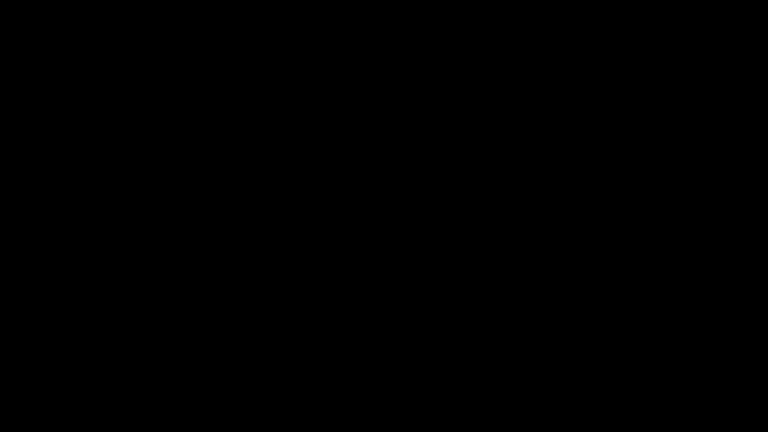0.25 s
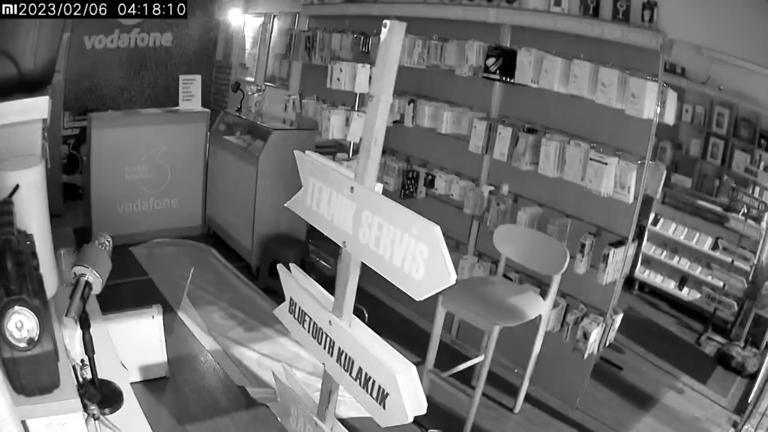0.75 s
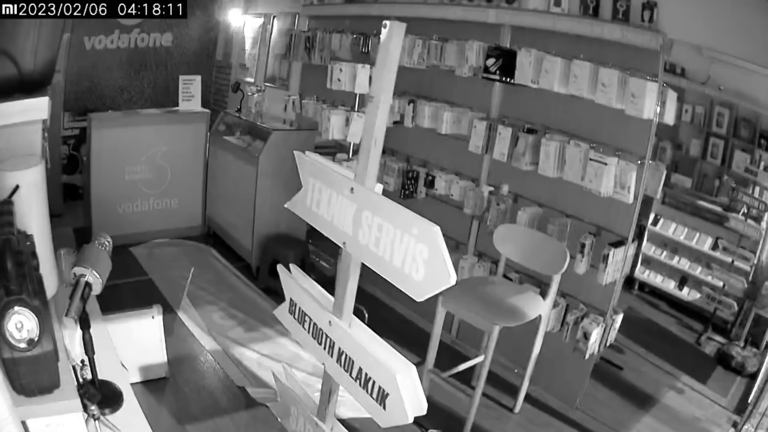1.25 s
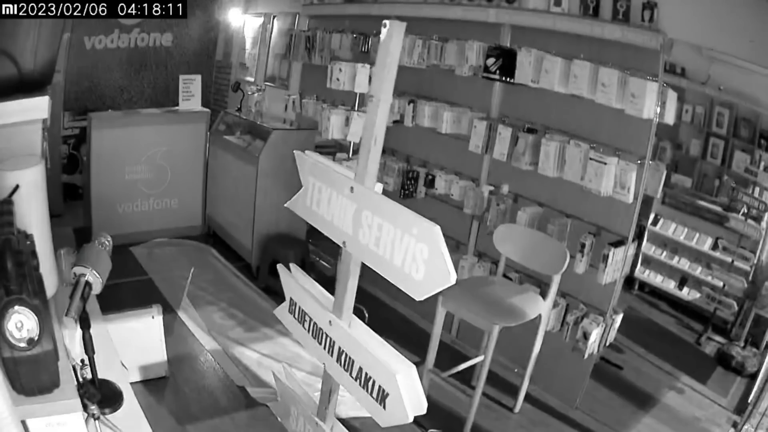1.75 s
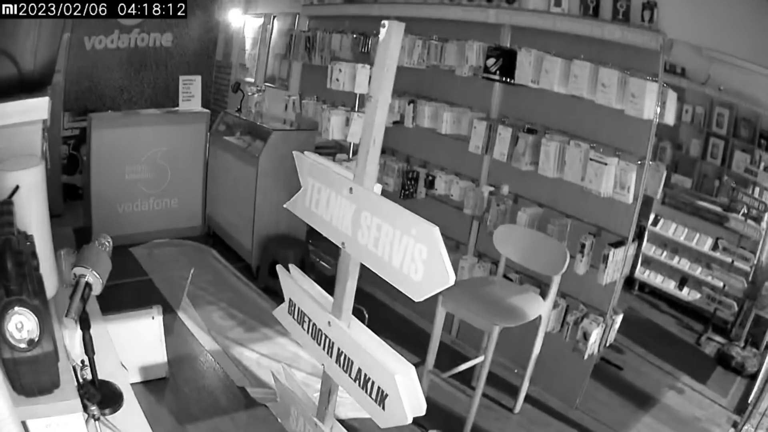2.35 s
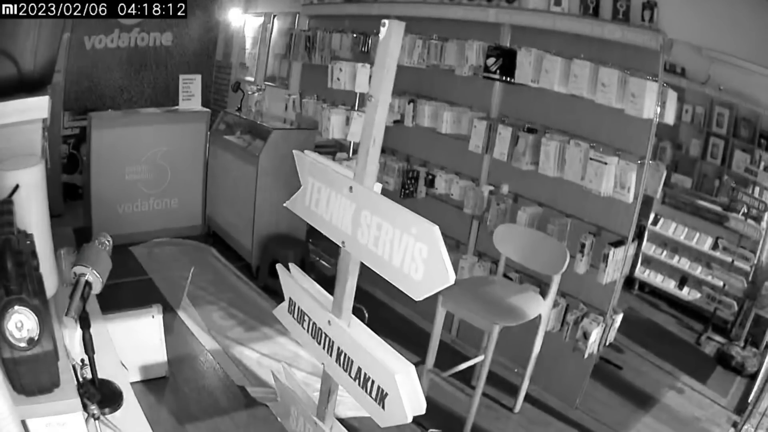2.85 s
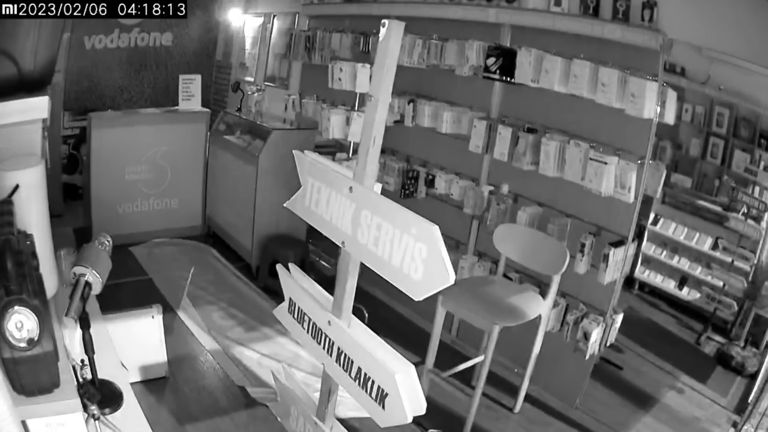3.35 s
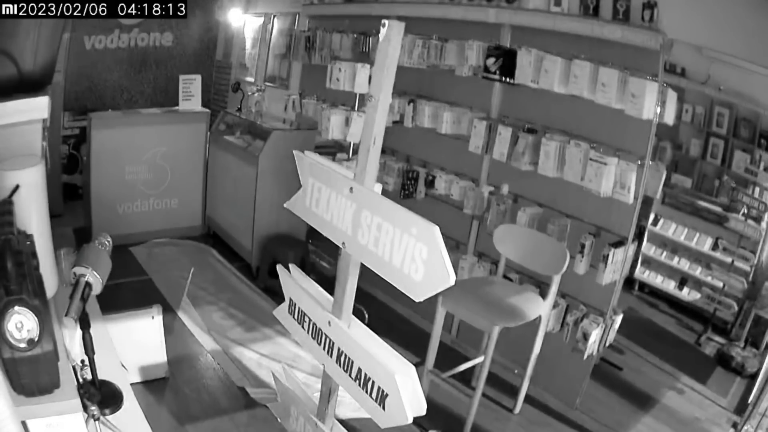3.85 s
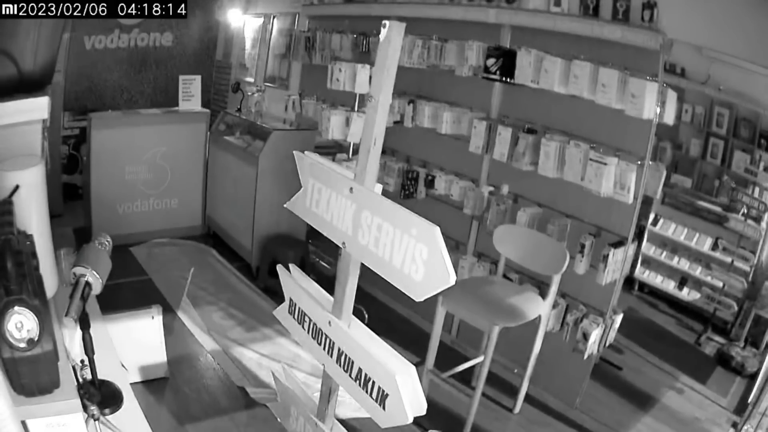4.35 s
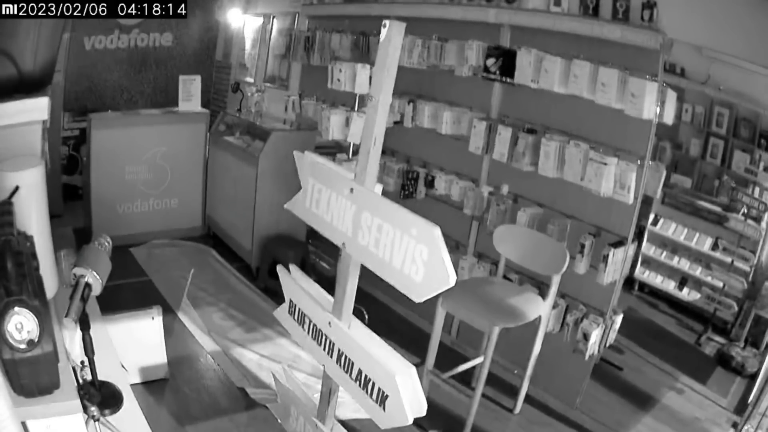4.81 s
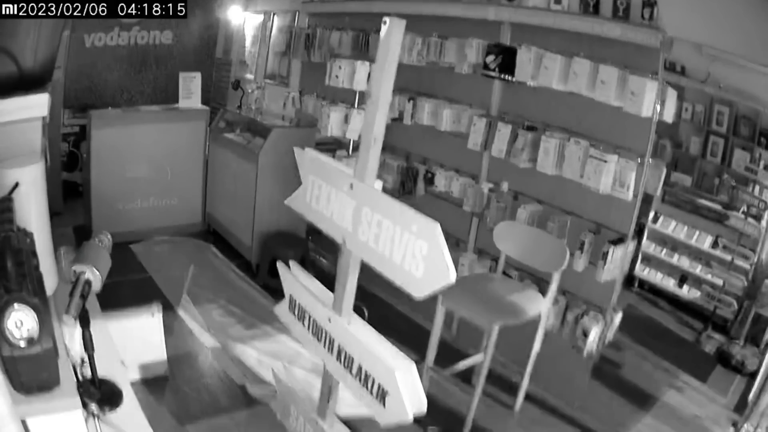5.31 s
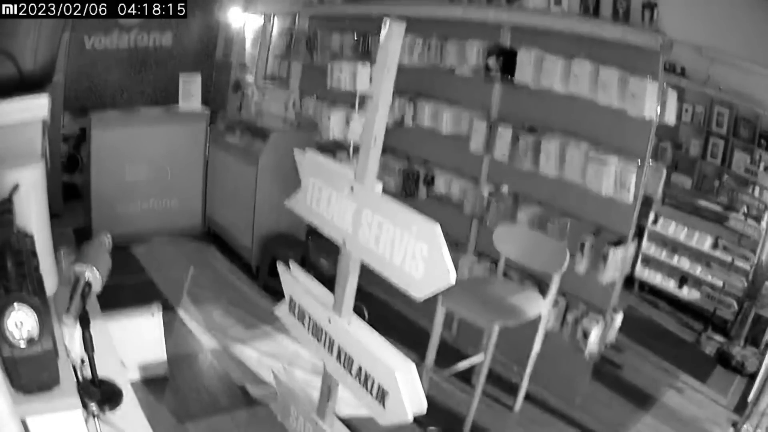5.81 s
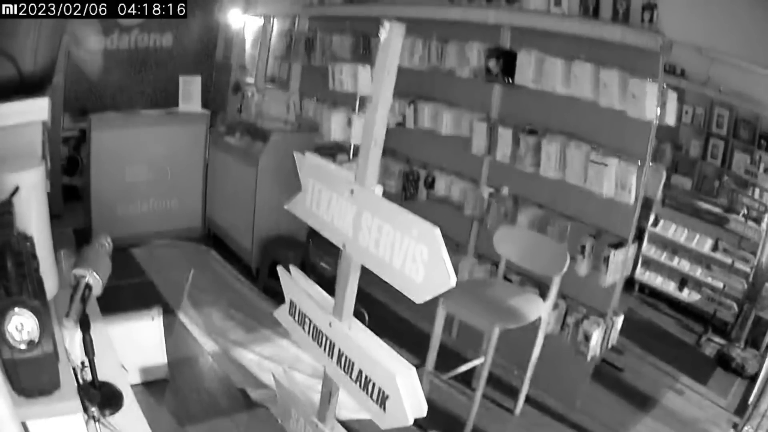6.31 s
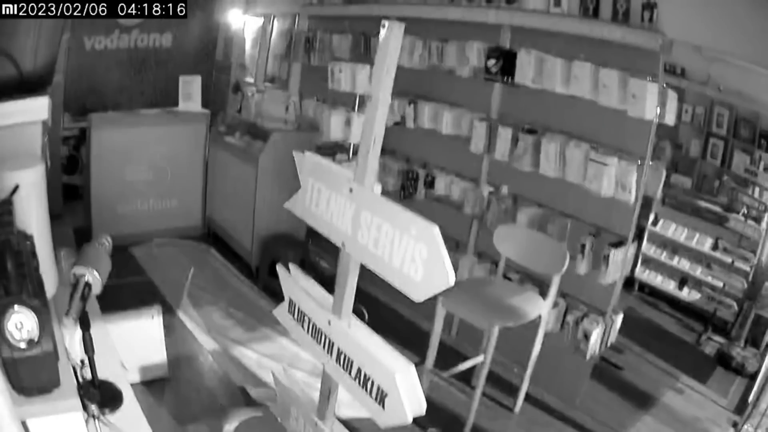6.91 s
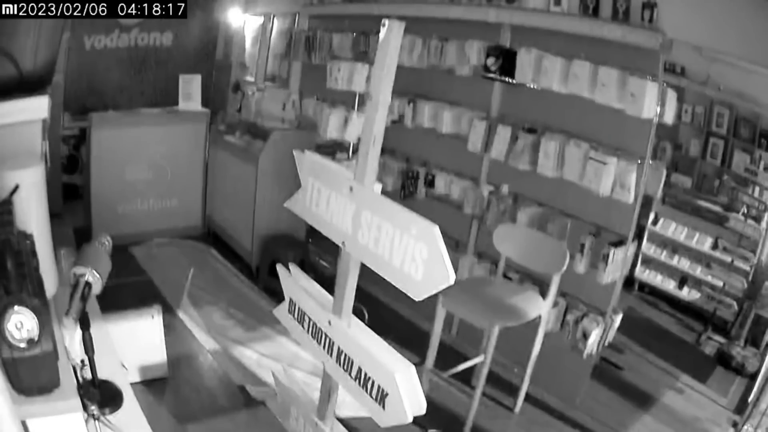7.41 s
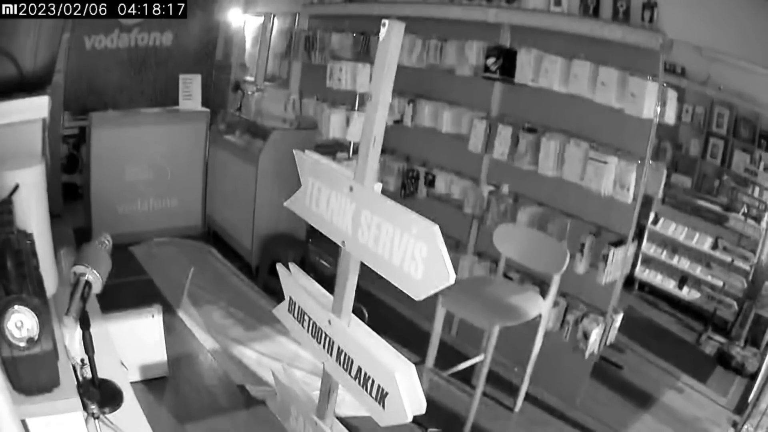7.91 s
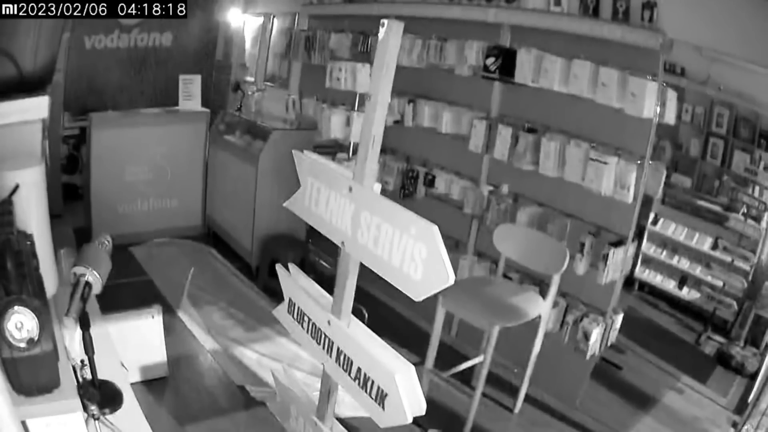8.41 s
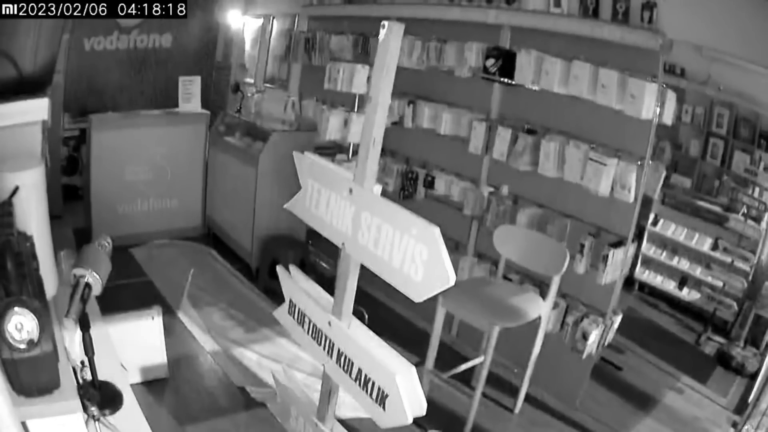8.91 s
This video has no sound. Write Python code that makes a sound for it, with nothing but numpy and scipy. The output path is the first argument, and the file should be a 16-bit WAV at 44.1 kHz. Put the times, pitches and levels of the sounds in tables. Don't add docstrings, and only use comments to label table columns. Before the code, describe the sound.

A very brief loud roar is chopped off into nearly a second of silence. Then a shaking shop: a loose metal fitting knocks irregularly on hollow shelving, over counter thuds and groaning panels. Clatter thickens midway, small goods jingle, and boxes crash down around seven seconds. Hard knocks continue to the end. Dense, close indoor echoes; narrow, muffled mono camera microphone, overloading, with watery compression and short dropouts.

```python
import sys
import numpy as np
from scipy import signal
from scipy.fft import rfft, irfft, next_fast_len
from scipy.io import wavfile
from scipy.ndimage import uniform_filter1d, minimum_filter1d

SR = 44100
rng = np.random.default_rng(int(sys.argv[2]) if len(sys.argv) > 2 else 0)


def amplitude_ratio(level_db):
    exponent = np.asarray(level_db, float) / 20
    return 10 ** exponent


def materialize(psi):
    bounded = np.clip(np.atleast_2d(psi).T, -1, 1)
    quanta = np.round(bounded * 32767).astype(np.int16)
    wavfile.write(sys.argv[1], SR, quanta)


N = 403956
T = np.arange(N) / SR


def rms_one(x):
    return x / np.sqrt(np.mean(x ** 2) + 1e-20)


def in_time(rows):
    s, *columns = np.transpose(rows)
    return [np.interp(T, s, c) for c in columns]


def coloured(x, spectrum):
    hz, level_db = np.transpose(spectrum)
    size = next_fast_len(N)
    log_hz = np.log(np.arange(size // 2 + 1) * SR / size + 1)
    gain = amplitude_ratio(np.interp(log_hz, np.log(hz), level_db))
    return rms_one(irfft(rfft(x, size) * gain, size)[:N])


def resonate(x, hz, width_hz):
    r = np.exp(-np.pi * max(width_hz, 3) / SR)
    w = 2 * np.pi * hz / SR
    return signal.lfilter([0, np.sin(w)], [1, -2 * r * np.cos(w), r * r], x + 1e-18)


def contacts(per_s, spread_db):
    where, size, sign = rng.random((60000, 3))[:round(per_s * N / SR)].T
    out = np.zeros(N)
    at = (where * N).astype(int)
    out[at] = amplitude_ratio(spread_db * np.minimum(-np.log(size), 4)) * np.sign(sign - .5)
    return rms_one(out)


def body(modes, per_s, spread_db):
    total = np.zeros(N)
    for hz, width_hz, db in modes:
        total += amplitude_ratio(db) * rms_one(resonate(contacts(per_s, spread_db), hz, width_hz))
    return rms_one(total)


def high_pass(x, order, hz):
    return signal.sosfilt(signal.butter(order, hz, "high", fs=SR, output="sos"), x)


def low_pass(x, order, stop_db, hz):
    return signal.sosfilt(signal.cheby2(order, stop_db, hz, fs=SR, output="sos"), x)


# t/s, level/dB
ROAR_LEVEL = [
    (0.0, -15),
    (0.054, -12),
    (0.134, -11),
    (0.147, -10.5),
]
# f/Hz, density/dB per Hz
ROAR_SPECTRUM = [(60, -11), (105, -9.5), (260, -2), (600, -9.5), (2240, -19), (5000, -35), (11500, -57.5),
                 (12300, -80.5)]
ROAR_END_S = .1485


def roar():
    loud = amplitude_ratio(in_time(ROAR_LEVEL)[0] + 1.5) * coloured(rng.standard_normal(N), ROAR_SPECTRUM)
    return low_pass(.9 * np.tanh(loud / .9), 12, 50, 12200) * (T < ROAR_END_S)


# clean ring/dB, rattling modes/dB, echo/dB, scatter of mode strengths/dB
CLATTER_STRIKE, FITTING_STRIKE = (-0.5, -1, -1, 6), (4, -3.5, -2, 1.2)
BUMP_STRIKE, FALL_STRIKE = (2, -2, 0.5, 3.5), (-4, -4.5, 1.5, 7)

# t/s, peak/dB, brightness/dB, t60/s
CLATTER_BLOWS = [(1.062, -37.5, -8.5, 0.48), (2.977, -46.5, -5, 0.33), (3.911, -32.5, -6, 1),
                 (4.654, -39.5, -13, 0.97), (5.042, -23.5, -13, 0.57), (5.15, -18, -7, 0.34),
                 (5.18, -28, -17, 0.84), (5.572, -19.5, -9, 0.42), (5.671, -22, -31.5, 0.58),
                 (6.086, -20, -22, 0.27), (6.147, -17.5, -19, 0.47), (6.203, -15, -10.5, 0.28),
                 (6.471, -27, -37, 0.46), (6.493, -16, -18, 0.33), (6.521, -11.5, -9.5, 0.52),
                 (6.545, -13, -11.5, 0.59), (6.609, -12.5, -13.5, 0.22), (6.976, -31, 2.5, 0.25),
                 (7.251, -34, -3.5, 0.15), (8.188, -35, -29.5, 0.43), (8.236, -30.5, 2.5, 0.28),
                 (8.269, -34, -4, 0.28)]
CLATTER_WOOD_DB = -23.5


def clatter():
    return [(s, db, bright, CLATTER_WOOD_DB, t60, *CLATTER_STRIKE) for s, db, bright, t60 in CLATTER_BLOWS]


# t/s, peak/dB, brightness/dB
FITTING_BLOWS = [(1.155, -10.5, -21.5), (1.905, -16, -27), (2.067, -14.5, -18.5), (2.242, -10.5, -18.5),
                 (2.573, -18.5, -25.5), (3.359, -15, -22), (3.471, -19, -22), (3.619, -11.5, -14.5),
                 (3.788, -7.5, -15.5), (3.936, -11, -16.5), (4.08, -14, -17.5), (4.706, -4, -14),
                 (4.878, -10.5, -12), (5.353, -8, -12.5), (5.47, -23, -8.5), (5.836, -15.5, -37),
                 (5.866, -19, -27), (6.037, -9, -31), (7.468, -7.5, -10.5), (8.324, -6.5, -17),
                 (8.472, -21.5, -30.5), (8.752, -14.5, -16.5), (8.997, -11.5, -19)]
FITTING_WOOD_DB, FITTING_WOOD_FOLLOWS, FITTING_T60_S = -27, .5, 0.29


def fitting():
    rows = []
    for s, db, bright in FITTING_BLOWS:
        wood_db = FITTING_WOOD_DB - (1 - FITTING_WOOD_FOLLOWS) * db
        rows.append((s, db, bright, wood_db, FITTING_T60_S, *FITTING_STRIKE))
    return rows


# t/s, peak/dB, wood/dB
BUMP_BLOWS = [(1.332, -35, -10.5), (1.399, -35.5, -2), (1.547, -21, -9), (1.783, -24, -8),
              (2.392, -23.5, -14), (2.722, -31, -7), (2.908, -26.5, -10.5), (3.161, -25.5, -10.5),
              (3.245, -33.5, -1.5), (4.554, -33, -12), (5.77, -25.5, -9), (8.87, -21.5, -18)]
BUMP_BRIGHT_DB, BUMP_T60_S = -49, 0.27


def bumps():
    return [(s, db, BUMP_BRIGHT_DB, wood, BUMP_T60_S, *BUMP_STRIKE) for s, db, wood in BUMP_BLOWS]


# t/s, peak/dB, brightness/dB, wood/dB, t60/s
FALL_BLOWS = [(4.465, -30.5, -9, -8, 0.3), (4.944, -21.5, -27, 3.5, 0.18), (6.778, -18, -13.5, -7.5, 0.086),
              (6.789, -20, -12, -5.5, 0.4), (6.981, -20.5, -1.5, -17, 0.18), (6.992, -12, -6, -8.5, 0.33),
              (7.142, -25, -22.5, -13, 0.47), (7.293, -31, -27.5, -3.5, 0.25), (7.584, -16, -3, -2.5, 0.35),
              (7.593, -4, -8, -6.5, 0.41), (7.6, -12.5, -3.5, -15, .3), (7.619, -6.5, -6, -14.5, 0.32),
              (7.844, -18, -12.5, 1.5, 0.3), (7.984, -16.5, -8.5, -1.5, .29)]


def falls():
    return [(*row, *FALL_STRIKE) for row in FALL_BLOWS]


def all_blows():
    return clatter() + fitting() + bumps() + falls()


def tails(times_s, level_db, t60s, rise_s):
    power, t = np.zeros(N), T[:SR // 2]
    for s, db, t60 in zip(times_s, level_db, t60s):
        i = round(s * SR)
        shape = amplitude_ratio(db - 60 * t / np.clip(t60, .05, .8)) * np.minimum(t / rise_s, 1)
        power[i:i + len(t)] += shape[:N - i] ** 2
    return np.sqrt(power)


# f/Hz, width/Hz, level/dB
UPRIGHTS = [(676, 31, -5.5), (897, 31, -13.5), (970, 14, -3), (1048.7, 25, 1.5), (1090, 17, -2),
            (1178, 22, -6.5), (1262, 23, 3.5), (1345, 20, 4), (1390, 32, 0), (1427, 27, -5),
            (1475, 30, -5.5), (1556, 30, -3.5), (1602, 28, -4.5), (1672, 33, -7.5)]
# f/Hz, width/Hz, level/dB
HOOKS = [(1752, 33, -6.5), (1836, 17, -7.5), (1911, 22, -3.5), (2108, 25, -3.5), (2139, 22, -6),
         (2315, 33, -9), (2424, 45, -9.5), (2566, 25, -9), (2866, 35, -9.5), (3004, 36, -10.5),
         (3230, 40, -11.5), (3590, 24, -18), (3860, 25, -14.5), (4010, 32, -16)]
# delay/s, level/dB
ECHOES = [(.0068, -6.5), (0.0124, -5.5), (0.0271, -9), (.04, -12.5)]
TRAVEL_S = .003
METAL_CUT_HZ = 680
LEAD_TICK_S, LEAD_TICK_DB = .0065, -20.5


def shelf_rings(at, peak_db, ring_db, scatter_db, hardness_db):
    modes = UPRIGHTS + HOOKS
    strengths = rng.standard_normal((len(at), len(modes))) * scatter_db[:, None]
    travel = np.round(rng.random(len(modes)) * TRAVEL_S * SR).astype(int)
    rings = np.zeros(N)
    for (hz, width_hz, db), strength_db, lag in zip(modes, strengths.T, travel):
        treble_db = hardness_db * np.clip((hz - 1200) / 2500, 0, 1)
        blows = np.zeros(N)
        blows[at + lag] = amplitude_ratio(peak_db + ring_db + db + strength_db + treble_db - 19.0)
        rings += resonate(blows, hz, 0.96 * width_hz)
    rings = high_pass(rings, 2, METAL_CUT_HZ)
    copies = ECHOES + [(-LEAD_TICK_S, LEAD_TICK_DB)]
    return rings + sum(amplitude_ratio(db) * np.roll(rings, round(lag_s * SR)) for lag_s, db in copies)


# f/Hz, width/Hz, level/dB
CRATE_MODES = [(383, 57, -1.5), (488, 37, 1.5), (575, 21, -3), (636, 93, 0.5), (683, 74, -4), (697, 91, -5),
               (844, 19, -9.5)]


def crate_thumps(at, level_db):
    thumps = np.zeros(N)
    thumps[at] = amplitude_ratio(level_db)
    total = np.zeros(N)
    for k, (hz, width_hz, db) in enumerate(CRATE_MODES):
        total += (-1) ** k * amplitude_ratio(db) * resonate(thumps, hz, .4 * width_hz)
    return total


# f/Hz, density/dB per Hz
SHELF_SPECTRUM = [(240, -44.5), (400, -16.5), (1000, -6.5), (1310, -2), (1680, -6), (2600, -10.5),
                  (3380, -41.5), (5720, -120)]
# f/Hz, density/dB per Hz
GOODS_SPECTRUM = [(1400, -28.5), (2100, -8.5), (2600, 4.5), (3400, 5), (4200, 1), (5000, -3), (5400, -7),
                  (6500, -43.5)]


def knocks():
    s, peak_db, bright_db, wood_db, t60, ring_db, rattle_db, echo_db, scatter_db = np.transpose(all_blows())
    at = np.round(s * SR).astype(int)
    hardness_db = np.minimum(bright_db + 19, 0)
    rings = shelf_rings(at, peak_db, ring_db, scatter_db, hardness_db)
    thumps = crate_thumps(at, peak_db + wood_db - 12.5)

    echoes = coloured(contacts(1500, spread_db=3.5), SHELF_SPECTRUM)
    echoes *= tails(s, peak_db + echo_db + 0.31 * hardness_db - 12.5, t60, rise_s=0.0033)
    humming = body(UPRIGHTS, per_s=440, spread_db=3.5)
    humming *= tails(s, peak_db + rattle_db - 14.5, 0.99 * t60, rise_s=0.006)
    shimmer = body(HOOKS, per_s=400, spread_db=2.0)
    shimmer *= tails(s, peak_db + rattle_db + 0.41 * hardness_db - 15.5, 1.2 * t60, rise_s=0.0026)
    wood = body(CRATE_MODES, per_s=590, spread_db=3.0)
    wood *= tails(s, peak_db + wood_db - 6.5, 1.1 * t60, rise_s=0.0092)
    crack = coloured(contacts(5000, spread_db=-1.5), GOODS_SPECTRUM)
    crack *= tails(s, peak_db + bright_db + 0.86 * echo_db - 4.5, 1.075 * t60, rise_s=0.00058)
    return rings + thumps + echoes + humming + shimmer + wood + crack


# t/s, level/dB
TREMOR_LEVEL = [(1.06, -56.5), (2.45, -77), (2.7, -56.5), (2.85, -71), (3.2, -67), (3.5, -64), (3.75, -73),
                (4.04, -48), (4.42, -64.5), (4.62, -52.5), (5.3, -47), (5.65, -51.5), (6.45, -58.5),
                (6.85, -56), (7.2, -57), (7.75, -44), (8.12, -54), (9.16, -49.5)]
HARD_RISE = 0.27


def swells(rows, rise_db_s, murmur_db):
    t = T[::32]
    power = amplitude_ratio(np.interp(t, *np.transpose(TREMOR_LEVEL)) + murmur_db) ** 2
    for s, db, t60 in rows:
        rise = rise_db_s * amplitude_ratio(HARD_RISE * (db + 40)) * (t - s)
        fall = -60 * (t - s) / max(t60, .05)
        power = power + amplitude_ratio(db + np.minimum(rise, fall)) ** 2
    return np.interp(T, t, np.sqrt(power))


# t/s, level/dB, t60/s
THUD_SHOVES = [(1.07, -40, 0.68), (1.17, -35.5, 0.22), (1.38, -44.5, 0.22), (1.58, -37, 0.53),
               (1.8, -29.5, 0.5), (2.14, -35.5, 0.75), (2.26, -40.5, 0.75), (2.7, -50, 0.64),
               (3.27, -36, 0.63), (3.38, -37, 0.5), (3.65, -33, 0.31), (3.79, -36.5, 0.3),
               (3.95, -38, 0.41), (4.26, -33, 0.42), (4.49, -29.5, 0.96), (4.76, -33.5, 1),
               (4.96, -22, 0.099), (5.2, -40.5, 0.51), (5.37, -34.5, 0.46), (5.87, -34, 0.22),
               (6.18, -28, 0.25), (6.36, -34.5, 0.25), (6.52, -28, 0.88), (6.79, -30.5, 0.1),
               (6.99, -35.5, 0.22), (7.31, -40.5, 0.81), (7.49, -43, 0.23), (7.6, -37, 0.19),
               (8.21, -41.5, 1), (8.91, -42.5, 0.36)]
# f/Hz, width/Hz, level/dB
COUNTER_MODES = [(65, 73, -25), (114, 20, -7), (146, 32, 1.5), (205, 66, -1.5), (230, 27, -5)]


def counter_thuds():
    return swells(THUD_SHOVES, rise_db_s=356, murmur_db=-2.5) * body(COUNTER_MODES, per_s=140, spread_db=-0.5)


# t/s, level/dB, t60/s
GROAN_SHOVES = [(1.17, -33.5, 0.12), (1.38, -34, 0.24), (1.59, -29, 0.36), (1.8, -32, 0.56),
                (2.14, -37, 0.18), (2.26, -33.5, 0.33), (3.27, -47, 0.4), (3.38, -37.5, 0.5),
                (3.65, -31, 0.22), (3.79, -38.5, 0.12), (4.26, -36, 0.37), (4.49, -28.5, 0.051),
                (4.72, -25.5, 0.21), (4.95, -29.5, 0.64), (5.37, -40.5, 0.32), (5.87, -41, 0.28),
                (6.07, -36, 0.24), (6.18, -32.5, 0.42), (6.36, -34, 0.27), (6.57, -27.5, 0.7),
                (6.79, -24, 0.14), (6.99, -16.5, 0.32), (7.49, -46, .15), (7.6, -16, 0.26),
                (7.87, -32.5, 0.23), (7.98, -35.5, 0.62), (8.21, -37, 0.76), (8.63, -43.5, 0.9),
                (8.77, -56, 0.31), (8.91, -27.5, 0.13)]
# f/Hz, width/Hz, level/dB
PANEL_MODES = [(270.7, 70, -2), (225, 100, 2), (284, 130, -5.5), (324, 60, -1.5), (378, 44, -6.5),
               (492.4, 52, -3.5), (640, 170, -6)]


def panel_groans():
    groan = body(PANEL_MODES, per_s=130, spread_db=3.5)
    return swells(GROAN_SHOVES, rise_db_s=403, murmur_db=6.5) * amplitude_ratio(-4) * groan


# t/s, level/dB, jingle share/dB, t60/s
RATTLE_SHOVES = [(1.3, -60, -17, 0.3), (1.56, -63, -22, 0.11), (1.802, -50.5, -14, 0.43),
                 (2.092, -45, -9, 0.52), (2.272, -42.5, -6.5, 0.61), (2.931, -57.5, -5, 0.59),
                 (3.43, -36, -19.5, 0.31), (3.653, -45.5, -9.5, 1), (4.109, -31.5, -11.5, 0.48),
                 (4.259, -41, -8, 0.12), (4.491, -44, -4.5, 0.15), (4.763, -38.5, -3, 1),
                 (4.959, -31, -9.5, 0.41), (5.199, -35.5, -5.5, 0.59), (5.8, -48.5, -23, 0.47),
                 (5.981, -42.5, -12.5, 0.63), (6.11, -32.5, -12, 0.8), (6.29, -49.5, 0.5, 0.33),
                 (6.52, -39, -14.5, 0.18), (7.31, -39, -38, 0.14), (7.49, -48, -25, 0.3),
                 (7.648, -33.5, 11, 0.21), (7.763, -31.5, -0.5, 0.99), (7.872, -40.5, 4.5, 0.38),
                 (8.35, -35, -16.5, 0.32), (8.91, -41.5, -24, 0.16)]
RATTLE_RISE_DB_S = 257.5


def rattles():
    chatters = [(s, db, t60) for s, db, _, t60 in RATTLE_SHOVES]
    jingles = [(s, db + share_db, t60) for s, db, share_db, t60 in RATTLE_SHOVES]
    chatter = coloured(contacts(3000, spread_db=2.5), SHELF_SPECTRUM)
    chatter *= swells(chatters, RATTLE_RISE_DB_S, murmur_db=-3)
    jingle = coloured(contacts(4200, spread_db=3.0), GOODS_SPECTRUM)
    jingle *= swells(jingles, RATTLE_RISE_DB_S, murmur_db=-9)
    return chatter + jingle


# t/s, f/Hz, level/dB
SINGING_PITCH = [
    (4.925, 277, -46.5),
    (4.96, 288.3, -23),
    (5.012, 292.6, -27),
    (5.03, 298, -42),
    (5.05, 281.5, -26),
    (5.09, 284, -36.5),
    (5.15, 285, -33.5),
    (5.18, 472, -39),
]


def singing_panel():
    hz, level_db = in_time(SINGING_PITCH)
    flutter = rms_one(resonate(rng.standard_normal(N), 45, 65))
    phase = 2 * np.pi * np.cumsum(hz * (1 + .03 * flutter)) / SR
    start, end = SINGING_PITCH[0][0], SINGING_PITCH[-1][0]
    sounding = np.interp(T, [start - .02, start, end, end + 0.016], [0, 1, 1, 0])
    octave = amplitude_ratio(-13 + 0.57 * (level_db + 24.5)) * np.sin(2 * phase)
    return amplitude_ratio(level_db + 2 + 1.6 * flutter) * sounding * (np.sin(phase) + octave)


# t/s, level/dB, f/Hz
LOW_BUMPS = [
    (5.58, -56, 40),
    (6.04, -59, 40),
    (6.519, -33, 45.5),
    (6.98, -45, 40),
    (7.594, -14.5, 60),
]


def low_bumps():
    return sum(amplitude_ratio(db) * resonate(np.abs(T - s) < .004, hz, .9 * hz) / 160 for s, db, hz in LOW_BUMPS)


# t/s, level/dB
SPLICE_TICKS = [(1.066, -54), (2.25, -55), (2.58, -54.5), (3.626, -49), (3.797, -57.5), (4.7083, -62),
                (4.7147, -38), (4.7227, -65), (6.042, -56), (8.328, -58), (8.34, -45), (8.349, -62)]


def splices():
    s, level_db = np.transpose(SPLICE_TICKS)
    ticks = np.zeros(N)
    ticks[np.round(s * SR).astype(int)] = amplitude_ratio(level_db)
    return resonate(ticks, 5230, 2000)


def spans(pairs):
    inside = sum((T > start) & (T < end) for start, end in pairs) > 0
    return uniform_filter1d(inside * 1., 400)


def coarse(x, share, size, step_db, spread, top_hz):
    count, band = N // size + 3, max(size // 128, 3)
    n = np.arange(2 * size) + .5
    window = np.sin(np.pi * n / (2 * size))
    bins = np.arange(size * top_hz * 2 // SR // band * band) + .5
    basis = window[:, None] * np.cos(np.pi / size * np.outer(n + size / 2, bins))
    rows = np.pad(x * np.sqrt(share), (size, count * size - N - size)).reshape(count, size)
    lines = np.hstack([rows[:-1], rows[1:]]) @ basis
    level = np.sqrt(np.mean(lines.reshape(count - 1, -1, band) ** 2, axis=2))
    level = np.repeat(-minimum_filter1d(-level, spread, axis=0), band, axis=1)
    treble_db = np.interp(bins * SR / (2 * size), [800, 2500], [-18, 0])
    step = level * amplitude_ratio(step_db + treble_db) + 1e-9
    blocks = (np.round(lines / step) * step) @ basis.T * 2 / size
    return (blocks[1:, :size] + blocks[:-1, size:]).ravel()[:N] * np.sqrt(share)


# from/s, to/s
STARVED_SPANS = [(1.06, 1.145), (1.475, 1.62), (1.75, 1.93), (2.09, 2.235), (2.59, 2.63), (2.88, 2.95),
                 (3.135, 3.21), (3.81, 4.075), (4.68, 4.7), (4.89, 4.945), (5.13, 5.2), (5.32, 5.345),
                 (5.53, 5.568), (5.83, 5.9), (6.05, 6.09), (6.38, 6.49), (6.91, 6.975), (7.49, 7.578),
                 (7.945, 7.98), (8.2, 8.32), (8.71, 8.745), (8.97, 8.99)]
# from/s, to/s, fade before/s, fade after/s
SILENT_SPANS = [
    (0, 1.062, 0.0017, 0.0028),
    (3.717, 3.765, 0.036, 0.0031),
    (3.838, 3.907, 0.016, 0.0059),
    (6.726, 6.769, 0.06, 0.0048),
    (6.846, 6.915, 0.0074, 0.0079),
]
BASS_CUT_HZ, CUTOFF_HZ, STRONG_DB = 95, 5150, -31
LOPSIDED = .9


def camera(x):
    x = high_pass(x, 3, BASS_CUT_HZ) + low_bumps()
    x = .7 * np.tanh(x / .7)
    x = low_pass(x + LOPSIDED * x ** 4, 10, 60, 1.3 * CUTOFF_HZ)
    loud = [s for s, db, *_ in all_blows() if db > STRONG_DB]
    starved = spans(STARVED_SPANS) * (1 - spans([(s - .004, s + .015) for s in loud]))
    attacks = spans([(s - .03, s + .035) for s in loud]) * (1 - starved)
    calm = np.clip(1 - starved - attacks, 0, 1)
    x = (coarse(x, calm, size=3584, step_db=11, spread=1, top_hz=5050)
         + coarse(x, attacks, size=256, step_db=-3.0, spread=5, top_hz=5300)
         + coarse(x, starved, size=512, step_db=9.2, spread=3, top_hz=5100))
    x = x / (1 + (x / .68) ** 6) ** (1 / 6)
    x = low_pass(x, 18, 45, 5230) + splices()
    for start, end, before, after in SILENT_SPANS:
        x = x * np.interp(T, [start - before, start, end, end + after], [1, 0, 0, 1])
    return x


def scene():
    shop = knocks() + counter_thuds() + panel_groans() + rattles() + singing_panel()
    return np.tile(roar() + camera(shop), (2, 1))


def band_limit(x):
    return signal.sosfilt(signal.butter(12, 16000, fs=SR, output="sos"), x)


def record(dry):
    return band_limit(dry)


dry = scene()
out = record(dry)
materialize(out)
```